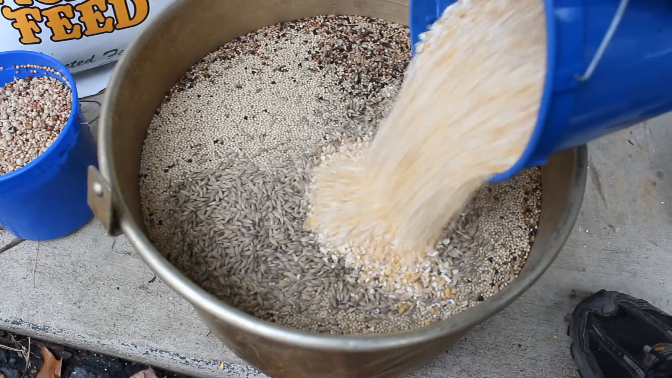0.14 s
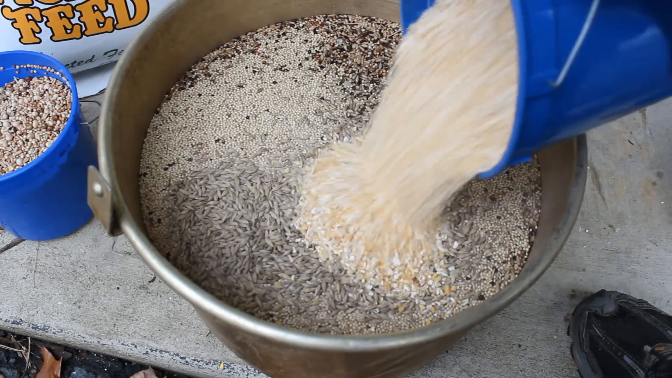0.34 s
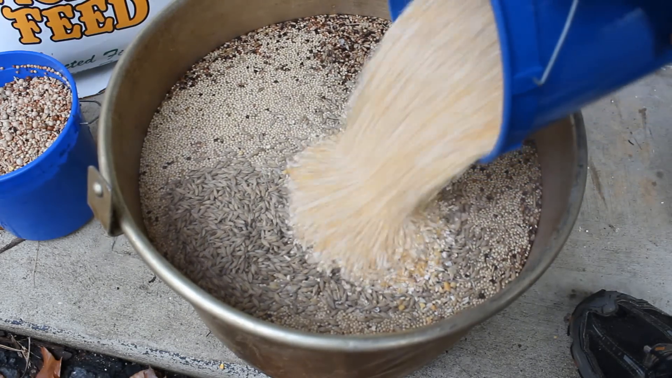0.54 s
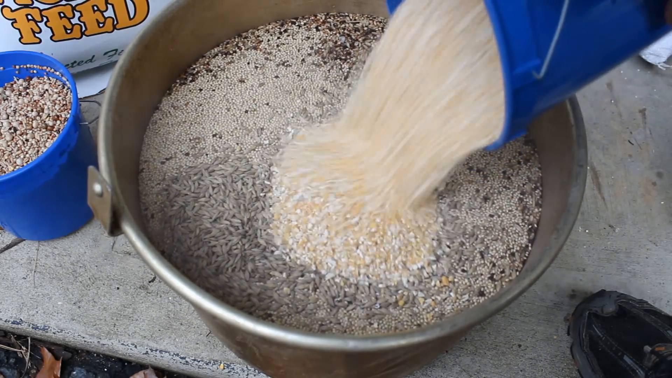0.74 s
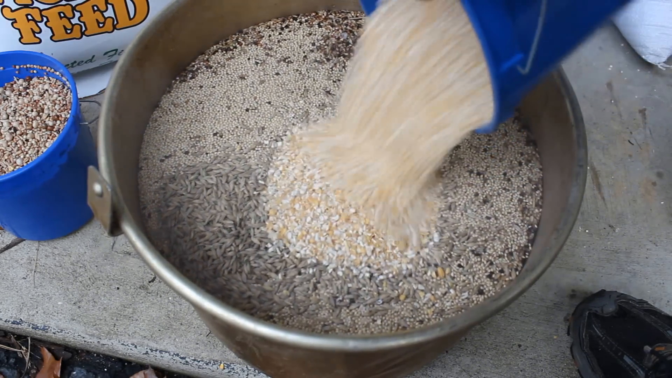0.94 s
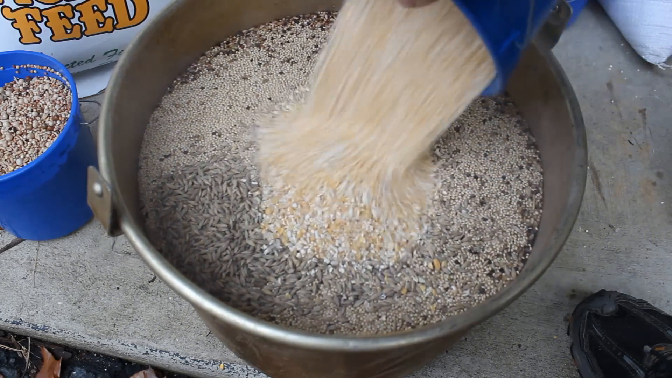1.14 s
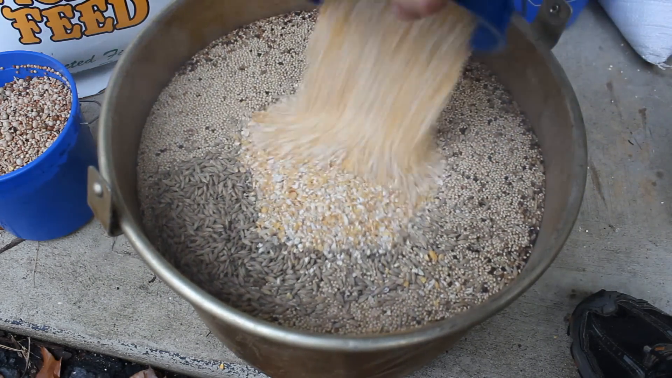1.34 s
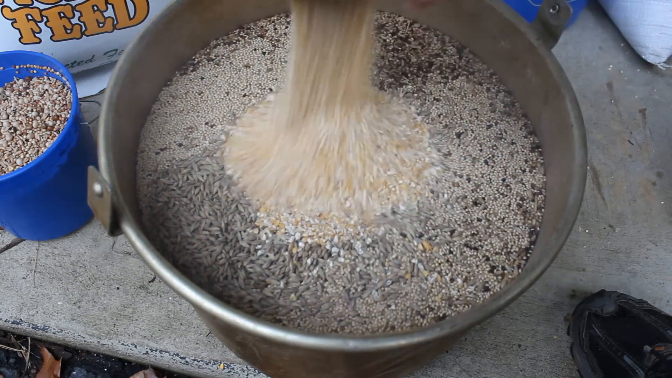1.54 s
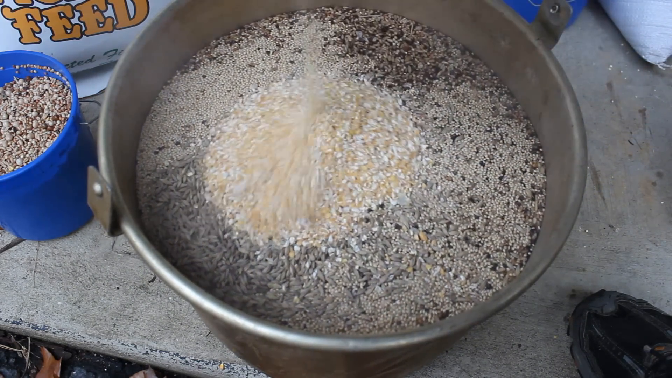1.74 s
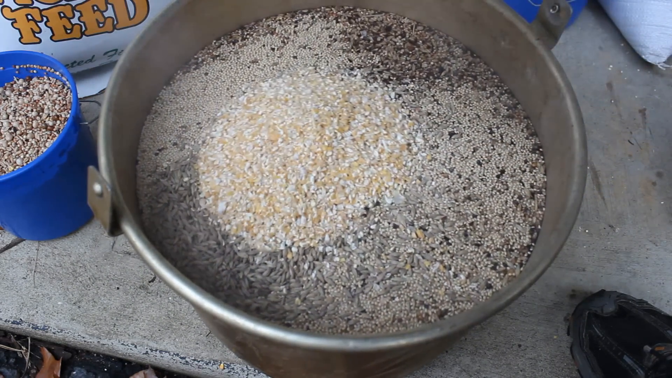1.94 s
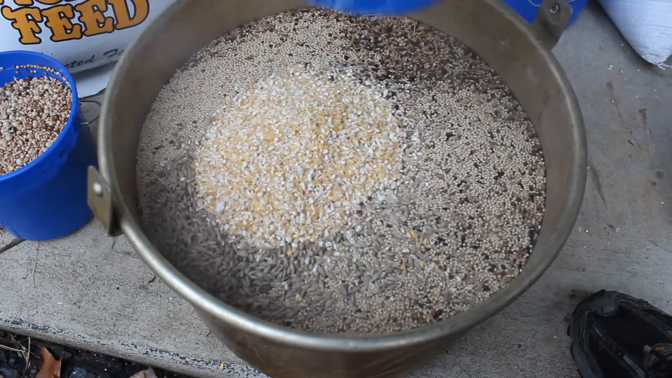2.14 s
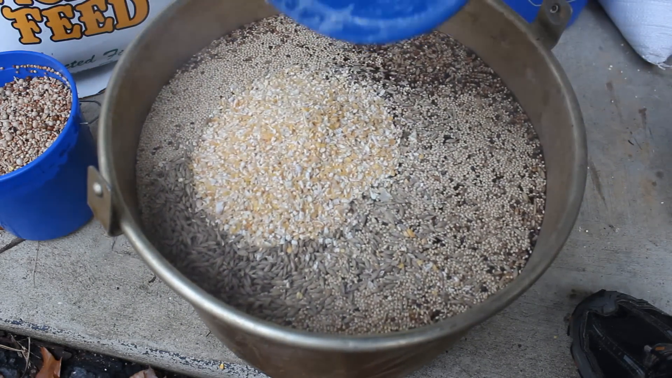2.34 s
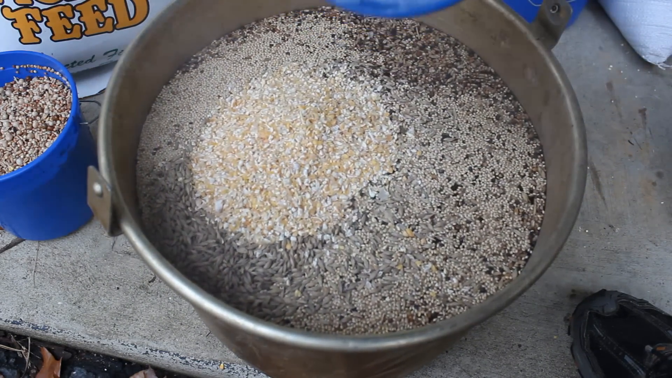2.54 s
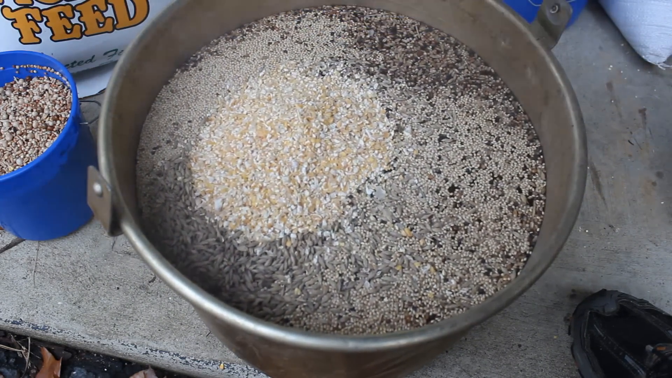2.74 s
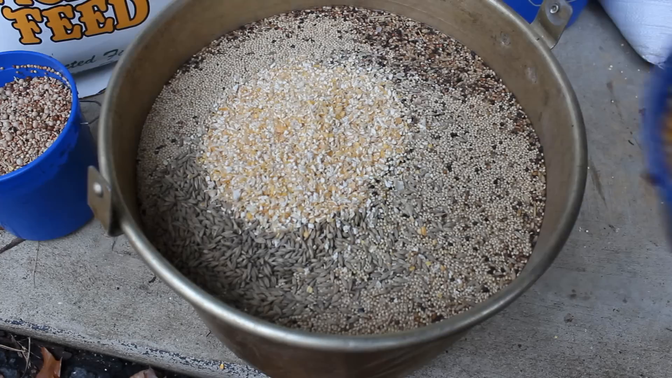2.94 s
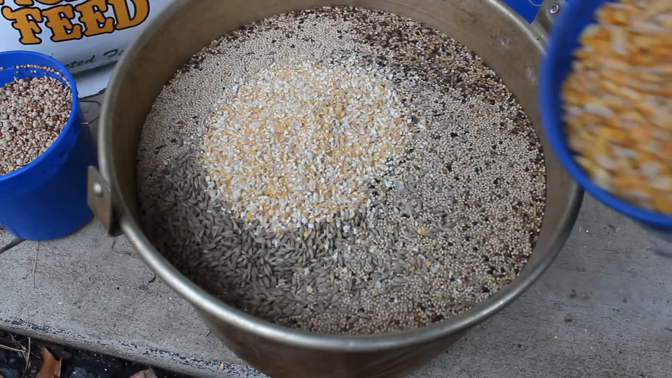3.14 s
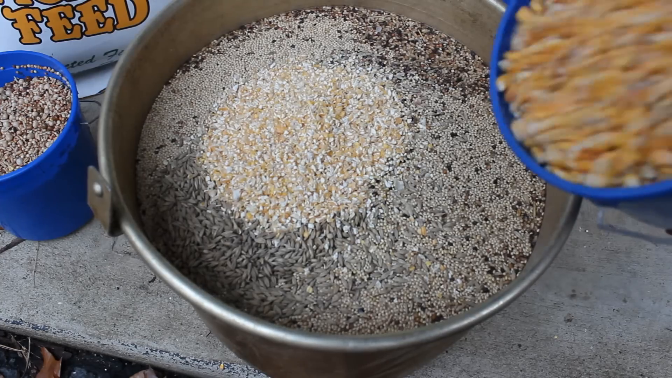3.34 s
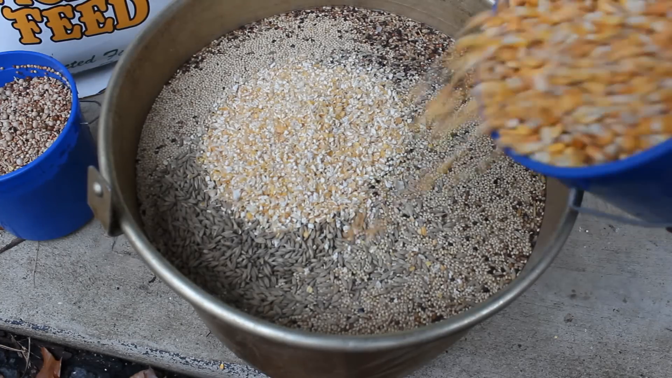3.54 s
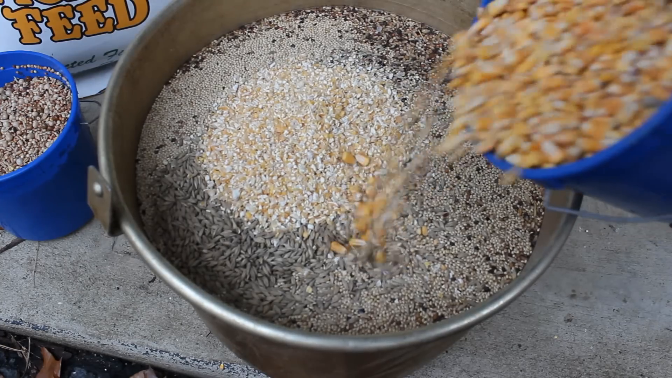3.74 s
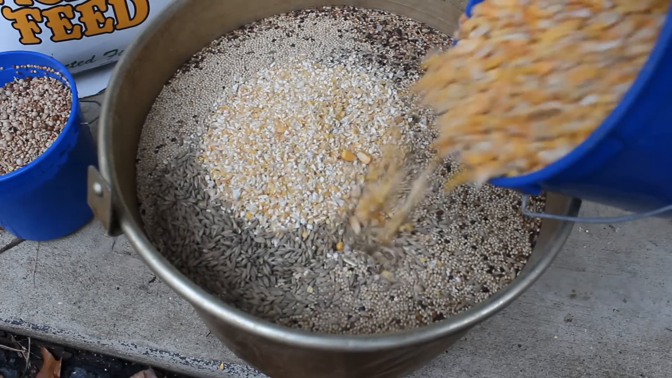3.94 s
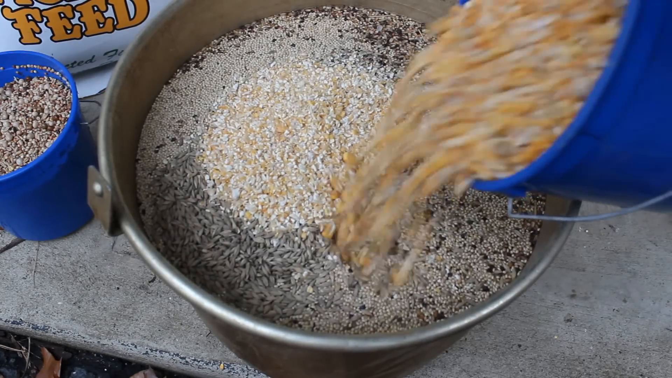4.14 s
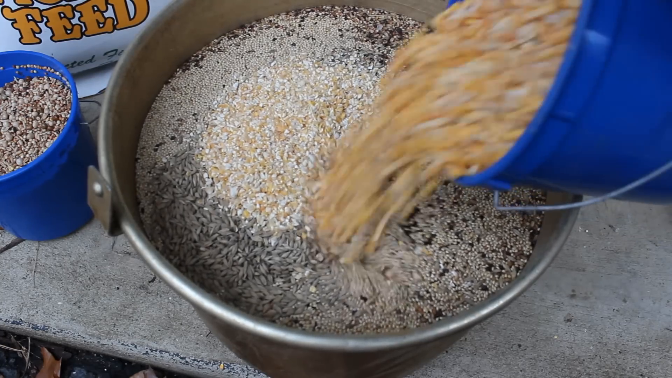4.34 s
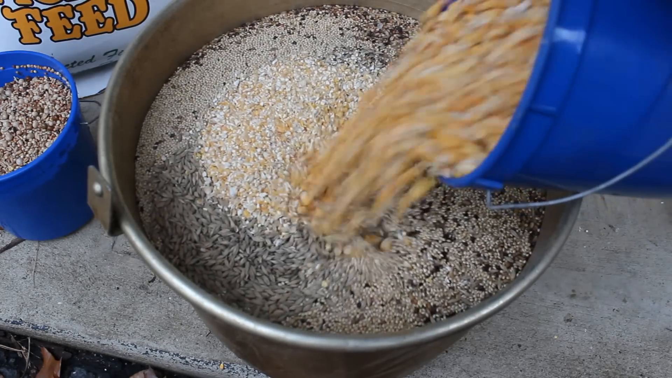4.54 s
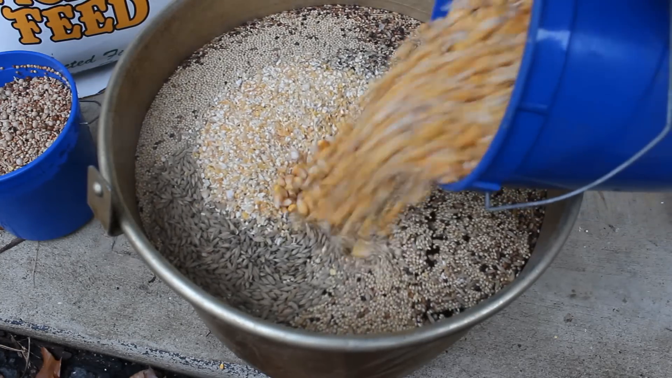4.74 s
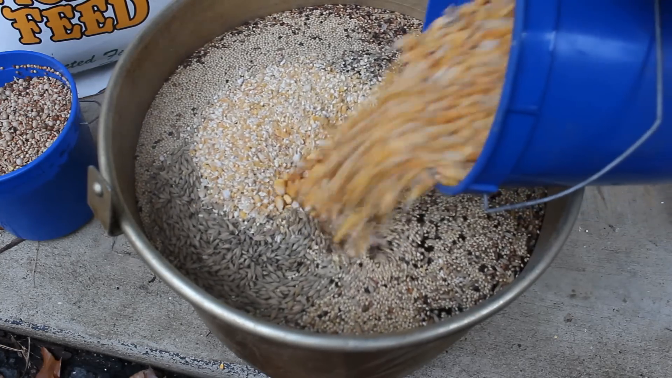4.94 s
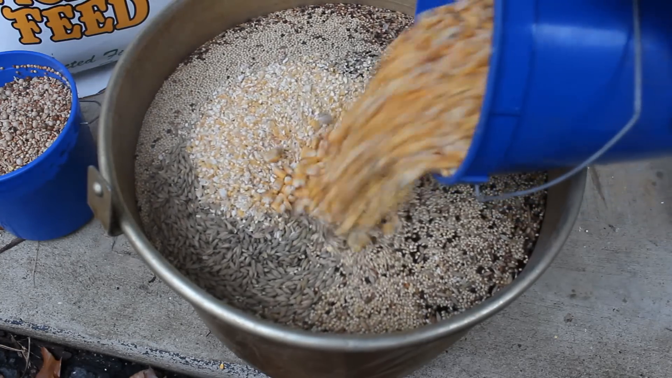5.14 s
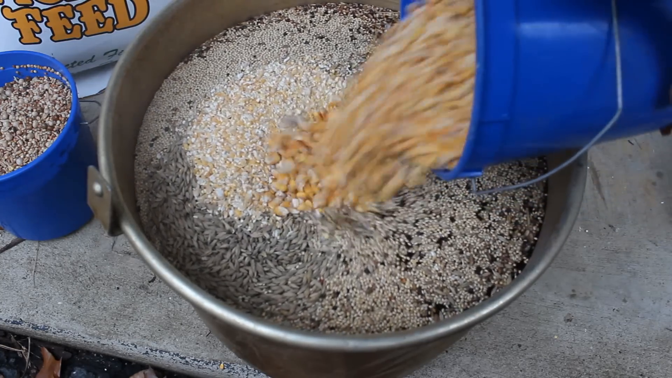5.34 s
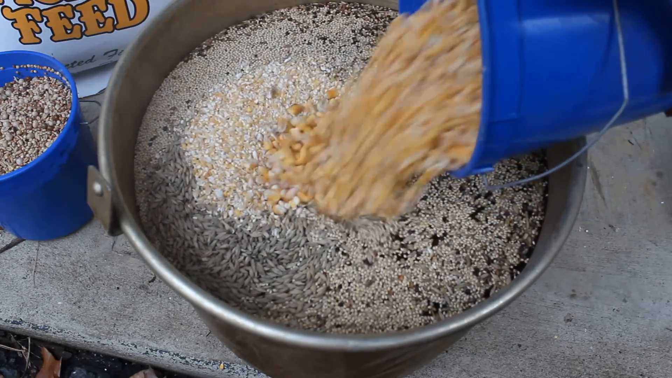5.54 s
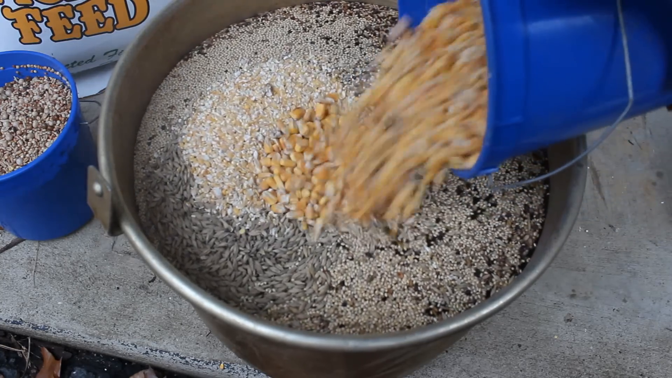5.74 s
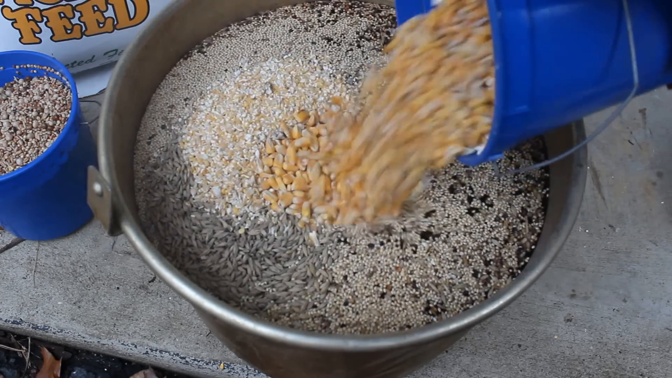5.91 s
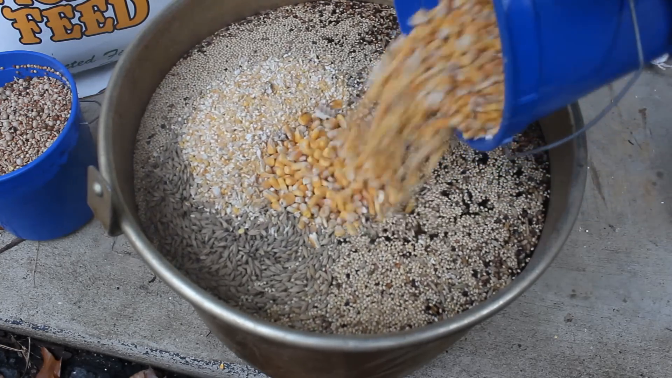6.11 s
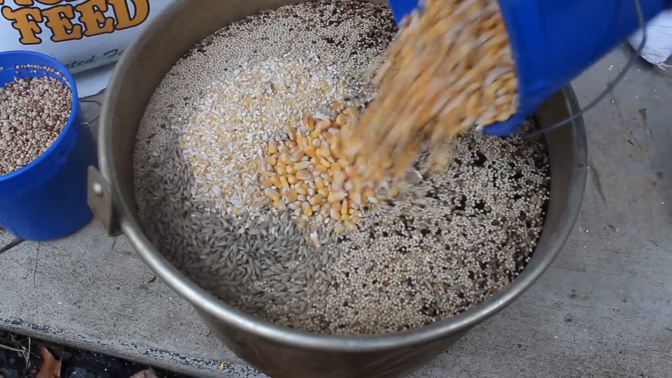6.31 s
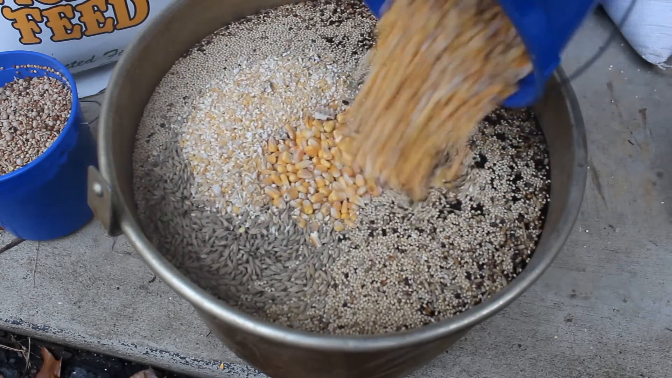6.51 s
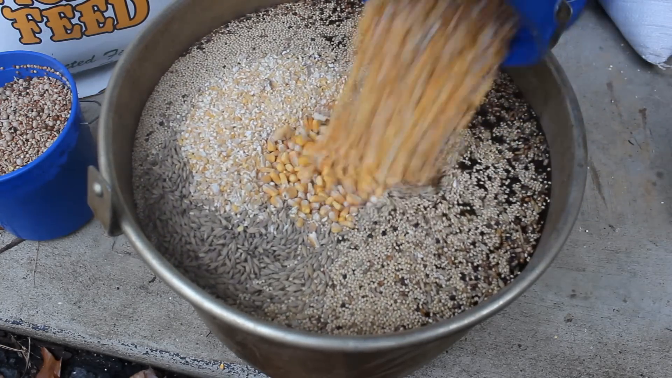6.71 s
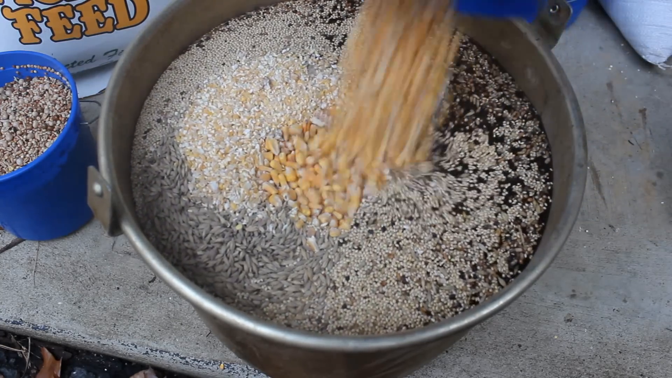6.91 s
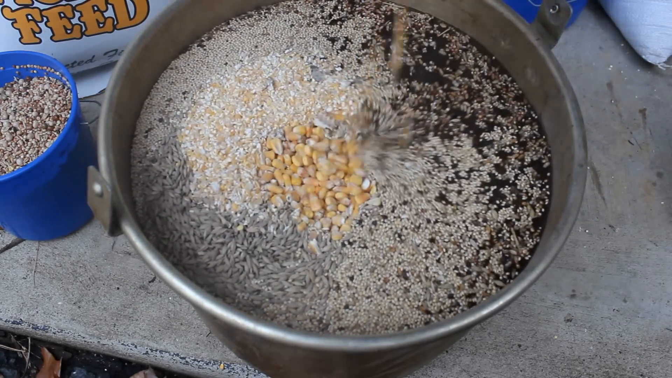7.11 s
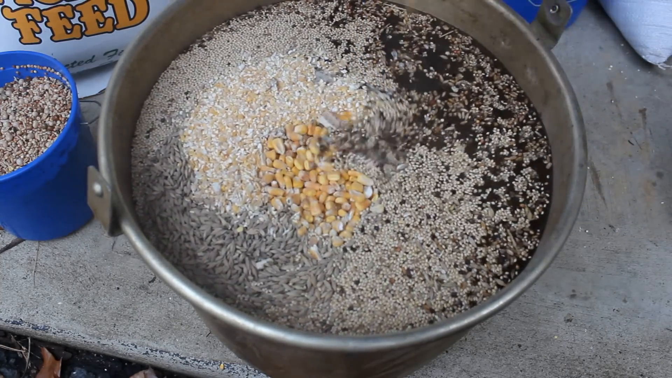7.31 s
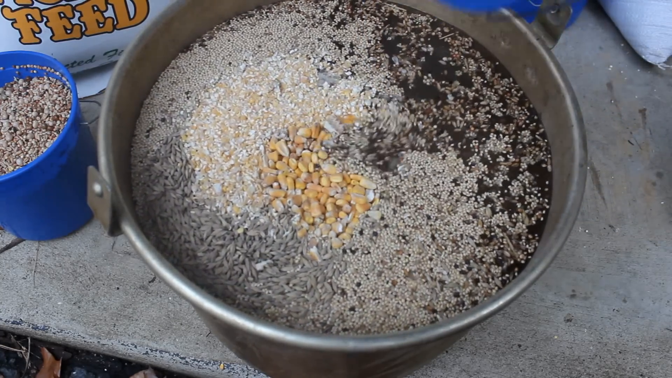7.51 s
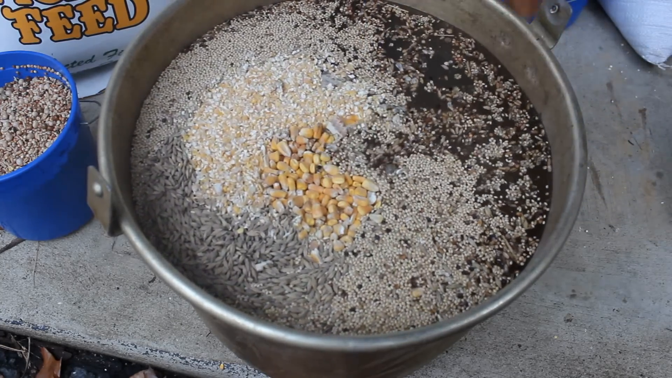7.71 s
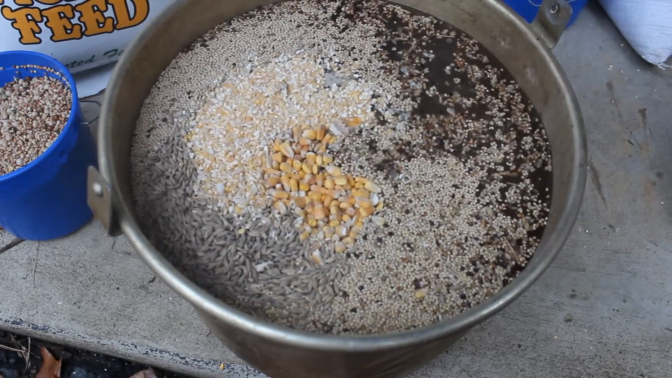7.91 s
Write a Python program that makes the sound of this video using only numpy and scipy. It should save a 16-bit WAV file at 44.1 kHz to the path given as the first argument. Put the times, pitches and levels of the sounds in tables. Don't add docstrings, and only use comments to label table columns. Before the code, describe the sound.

Close outdoor mono pickup. Fine dry grain hisses from a plastic bucket into a metal pot of seed, swelling then stopping with a faint metallic ring. Leftovers tick and rattle, the wire handle clacks sharply, then whole kernels knock on plastic, trickle and build into a loud, coarse gush. A few last knocks follow over faint traffic and trilling insects.

```python
import sys
import numpy as np
from scipy import signal
from scipy.fft import rfft, irfft, next_fast_len
from scipy.io import wavfile
from scipy.ndimage import uniform_filter1d, map_coordinates

SR = 44100
rng = np.random.default_rng(int(sys.argv[2]) if len(sys.argv) > 2 else 0)


def to_wav(s):
    ch = np.atleast_2d(s).T
    pcm = np.round(np.clip(ch, -1, 1) * 32767)
    wavfile.write(sys.argv[1], SR, pcm.astype(np.int16))


def to_linear_factor(level_db):
    exponent = np.asarray(level_db, float) / 20
    return 10 ** exponent


N = 355754


def unit(x):
    return x / np.sqrt(np.mean(x ** 2) + 1e-20)


def curves(rows):
    s, *cols = np.transpose(rows)
    return np.array([np.interp(np.arange(N) / SR, s, c) for c in cols])


def wobble(rate):
    return map_coordinates(rng.standard_normal(int(N * rate / SR) + 4), [np.arange(N) * rate / SR])


def coloured(x, spectrum):
    m = 2 * next_fast_len(len(x) // 2 + 4096, True)
    f, db = np.transpose(spectrum)
    log_hz = np.log(np.fft.rfftfreq(m, 1 / SR) + 1)
    gain = to_linear_factor(np.interp(log_hz, np.log(f + 1), np.maximum(db, -60)))
    cepstrum = irfft(np.log(unit(gain)), m)
    cepstrum[1:m // 2] *= 2
    cepstrum[m // 2 + 1:] = 0
    return irfft(rfft(x, m) * np.exp(rfft(cepstrum)), m)[:len(x)]


def place(out, start_s, sound):
    out[round(start_s * SR):][:len(sound)] += sound


# hz, level_db_per_hz
TRAFFIC_COLOUR = [(12, -42), (20, -13), (102, 1.5), (159, -6), (216, -2), (330, -9), (488, -7.5),
                  (611, -8.5), (743, -9), (2480, -18.5), (3570, -22), (4220, -25), (4990, -27.5),
                  (14900, -39), (16200, -40)]
# time_s, level_db
YARD_LEVEL = [(0, -44), (2.2, -43.5), (2.9, -44), (3.6, -43), (4.6, -50.5), (5.7, -46), (6.9, -49),
              (7.8, -45.5)]
# time_s, level_db
INSECT_LEVEL = [(1.8, -60), (2.1, -52), (2.5, -52), (3.0, -54), (3.3, -51), (7.6, -49)]


def yard():
    z = signal.stft(rng.standard_normal(N + 512), nperseg=512)[2]
    patches = uniform_filter1d(rng.standard_normal(z.shape), 5, axis=0)
    patches = uniform_filter1d(patches, 12, axis=1)
    air = signal.istft(z * to_linear_factor(0.8 * unit(patches)), nperseg=512)[1][:N]
    traffic = to_linear_factor(curves(YARD_LEVEL)[0] + 0.61 * wobble(2.28)) * unit(coloured(air, TRAFFIC_COLOUR))
    stroke_phase = 2 * np.pi * np.cumsum(60 + 8 * wobble(5.8)) / SR
    strokes = to_linear_factor(4.4 * np.sin(stroke_phase) + 0.84 * wobble(8))
    wing = [(3500, -37), (3950, -1), (4190, 0), (4450, -7), (4900, -30.5)]
    trill = unit(coloured(strokes * rng.standard_normal(N), wing))
    return traffic + to_linear_factor(curves(INSECT_LEVEL)[0]) * trill


# pitch_hz, level_db, t60_s
POT_MODES = [(489, -45.5, 5), (558, -50.5, 6)]


def pot():
    t = np.arange(N) / SR - 1.84
    swell = np.clip(1 + t / 0.25, 0, 1) ** 2
    out = np.zeros(N)
    for hz, db, t60 in POT_MODES:
        level = to_linear_factor(db - 60 * t.clip(0) / t60 + wobble(4.8))
        out += swell * level * np.sin(2 * np.pi * hz * t)
    return out


# start_s, clack_db, thump_db
HANDLE_FALLS = [(2.872, -2, -27.5), (2.944, -14.5, -36), (3.141, -58, -45), (3.185, -41, -27.5),
                (3.21, -58, -35), (3.245, -42, -34)]
# pitch_hz, level_db, t60_s
WIRE_MODES = [(934, -16.5, 0.03), (1525, -9.5, 0.029), (2000, -1, 0.026), (2810, 0, 0.019),
              (3560, -4, 0.015), (4720, -7.5, 0.023), (5170, -9, 0.018), (6540, -6, 0.013),
              (7200, -20, 0.02), (7300, -20, 0.025)]


def handle():
    t, out = np.arange(SR // 8) / SR, np.zeros(N + SR)
    grit_colour = [(300, -24), (2000, 2.5), (5000, -5.5), (8000, -11.5), (12000, -15), (16000, -20)]
    puff_colour = [(70, -14), (170, -3), (450, -0.5), (800, -8), (2000, -32)]
    attack = 1 - np.exp(-t / 0.00037)
    for s, clack_db, thump_db in HANDLE_FALLS:
        ring = np.zeros(len(t))
        for hz, db, t60 in WIRE_MODES:
            ring += to_linear_factor(db + rng.normal(0, 1.6) - 60 * t / t60) * np.sin(2 * np.pi * hz * t)
        grit = (to_linear_factor(-60 * t / 0.01) + to_linear_factor(-22.5 - 60 * t / 0.12)) * rng.standard_normal(len(t))
        clack = ring + to_linear_factor(-1.5) * coloured(grit, grit_colour)
        puff = coloured(to_linear_factor(-60 * t / 0.032) * rng.standard_normal(len(t)), puff_colour)
        place(out, s, (to_linear_factor(clack_db - 2.0) * clack + to_linear_factor(thump_db) * puff) * attack)
    return out[:N]


# start_s, peak_db
RIM_GLANCES = [(3.9413, -0.5), (7.307, -11), (7.4485, -17.5)]
# start_s, peak_db
SPARKS = [(3.1844, -37), (3.2417, -36), (3.2677, -28), (3.2886, -26), (3.328, -27), (3.351, -34),
          (3.36, -32), (3.3774, -32), (3.3839, -26), (3.4158, -26), (3.4383, -26), (3.4488, -24),
          (3.4857, -19), (3.5256, -20), (3.5495, -26), (3.6463, -26), (3.6767, -28), (3.6972, -29),
          (3.7241, -24), (3.7501, -29), (3.766, -13), (3.783, -19), (3.783, -8), (3.7975, -3),
          (3.8414, -13), (3.8573, -20), (3.8633, -15), (3.9157, -15), (3.9415, -3), (3.9681, -17),
          (3.9935, -27), (4.021, -28), (4.0679, -26), (4.0868, -23), (4.1237, -20), (4.1866, -20),
          (4.2035, -33), (4.2035, -12), (4.2425, -18), (4.2789, -22), (4.2789, -13), (4.3173, -11),
          (4.4066, -19), (4.439, -18), (4.46, -12), (4.674, -17), (4.7049, -12), (4.7937, -14), (4.839, -8),
          (4.8965, -9), (5.0387, -2), (5.316, -12),
          (2.36, -24), (2.3734, -27), (2.3804, -33), (2.4224, -32), (2.5184, -39), (2.5237, -32),
               (2.5406, -52), (2.5406, -37), (5.4929, -5), (7.2943, -15), (7.3243, -23), (7.3344, -27),
               (7.3662, -17), (7.4071, -21), (7.5053, -35), (7.549, -26), (7.6216, -42), (7.645, -40),
               (7.6695, -32), (7.7957, -43), (7.8072, -31), (7.8224, -36), (7.865, -41), (7.9399, -38)]


def rim():
    t, out = np.arange(SR // 20) / SR, np.zeros(N + SR)
    fall = to_linear_factor(-60 * t / 0.0017) + to_linear_factor(-20 - 60 * t / 0.043)
    sparks = [(s, db - 5) for s, db in SPARKS]
    for s, db in RIM_GLANCES + sparks:
        place(out, s, to_linear_factor(db) * fall * np.sign(rng.standard_normal(len(t))))
    return coloured(out, [(5000, -36), (9000, -9), (12000, 1), (15500, 1), (17000, -9)])[:N]


# start_s, peak_db, ring_hz, hollow_db
SHAKEN = [(1.8462, -21, 4060, -18), (1.9475, -23.5, 3540, -15), (2.3107, -13, 3540, -27),
          (2.3413, -12, 1950, -22), (2.354, -16, 1920, -21), (2.361, -15, 3300, -16),
          (2.374, -11.5, 4120, -31), (2.3817, -21, 2920, -22), (2.4023, -9, 2820, -34),
          (2.4387, -14, 3400, -21), (2.4744, -19, 3050, -27), (2.6373, -22, 3070, -20),
          (2.661, -19.5, 3720, -23), (2.726, -19, 2700, -14), (2.7686, -23, 3000, -27),
          (2.9133, -20, 3070, -25), (3.1843, -19.5, 3520, -6), (3.2508, -21.5, 2000, -2),
          (3.3288, -23, 3210, -8)]
# start_s, peak_db, ring_hz, hollow_db
FIRST = [(3.3512, -13, 3140, -5.5), (3.3604, -8, 2700, -21), (3.3827, -11, 2640, -21),
         (3.394, -11, 2540, -14), (3.404, -12, 3160, -14), (3.4166, 2.5, 2650, -29), (3.438, 1, 2610, -22),
         (3.4505, 2.5, 2700, -13), (3.486, 0, 2800, -16), (3.4976, -1.5, 3450, -14),
         (3.55, -0.5, 3350, -14), (3.5966, -4.5, 2900, -29), (3.6178, -6, 2970, -21),
         (3.677, -5, 2320, -25), (3.6906, -5, 2450, -24), (3.7254, -16, 4120, -19), (3.75, -8, 2940, -13),
         (3.7835, -9.5, 4110, -14), (3.798, -10, 4100, -30.5), (4.04, -10, 3240, -17),
         (4.1, -11.5, 2600, -5), (4.185, -7, 2890, -8), (4.1982, -2, 2550, -17), (4.2126, -9, 3100, -7),
         (4.318, -7, 3670, -9), (4.4472, -10, 3230, -26), (4.491, -3.5, 3200, -14), (4.6038, -5, 2510, -17),
         (4.7353, -4, 3640, -15), (4.807, -20, 4380, -29)]
# start_s, peak_db, ring_hz, hollow_db
LAST = [(7.2109, -7, 4350, -23), (7.289, -19, 2900, -15), (7.3149, -1.5, 2400, -12), (7.351, 0, 3400, -23),
        (7.3577, 0, 2380, -21.5), (7.3653, -2.5, 2900, -24), (7.4057, -6, 3380, -26),
        (7.419, -0.5, 3000, -16), (7.4485, -9.5, 2820, -25), (7.487, -10, 2370, -12),
        (7.495, -2, 1990, -13)]
# start_s, peak_db, ring_hz, hollow_db
DREGS = [(7.673, -19, 3560, -21), (7.7395, -14, 2900, -17), (7.7591, -8, 3120, -25),
         (7.7698, -2.5, 3160, -17), (7.8083, -1, 2510, -22), (7.863, -13.5, 3070, -8),
         (7.875, -14.5, 3080, -7), (7.9042, -5.5, 3070, -13), (7.942, -15, 2400, -1.5),
         (7.993, -14.5, 2640, -16), (8.0006, -8.5, 2430, -3), (8.053, -13.5, 2550, -7),
         (8.0604, -17, 3320, -10)]
# start_s, peak_db
CLICKS = [(2.353, -19), (2.4032, -26), (2.5444, -29), (3.726, -15), (3.7757, -17), (3.782, -13),
          (3.798, -13), (3.8185, -15), (3.864, -16), (3.877, -14), (3.9684, -20), (4.035, -21),
          (4.124, -14), (4.1944, -11), (4.2033, -15), (4.279, -13), (4.317, -5), (4.4614, -5), (4.516, -6),
          (4.633, -6.5), (4.8064, -8.5), (4.839, -9.5), (4.8726, -9), (4.898, -9), (6.393, -6.5),
          (7.1604, -12), (7.2497, -12), (7.549, -23), (7.6703, -29)]
GLINT_DB = -19, -15.5, -25.5


def clicks():
    t, out = np.arange(SR // 20) / SR, np.zeros(N + SR)
    fall = to_linear_factor(-60 * t / 0.0022) + to_linear_factor(-16.0 - 60 * t / 0.086)
    glints = []
    for rows, under_db in zip([SHAKEN, FIRST, LAST + DREGS], GLINT_DB):
        glints += [(s, db + under_db) for s, db, *_ in rows]
    for s, db in CLICKS + glints:
        spike = fall * rng.standard_normal(len(t))
        spike *= 2 * np.linalg.norm(fall) / np.linalg.norm(spike)
        place(out, s, to_linear_factor(db - 6.5) * spike)
    colour = [(1500, -57), (4000, 4.0), (7000, 3.5), (11000, -5.0), (15000, -7), (17000, -13.0)]
    return coloured(out, colour)[:N]


# hz, level_db_per_hz
HOLLOW = [(470, -34), (800, -10.5), (889, -3), (1230, 2.5), (1380, 0.5), (1510, 3), (1720, -13), (1800, -1),
          (2340, -28.5), (3960, -120)]


def knocks(rows, bed, ring_db, t60, air_hz, air_db):
    t = np.arange(SR // 8) / SR
    body, hollow, rings = np.zeros((3, N + SR))
    rise = 1 - np.exp(-t / 0.00026)
    fall = rise * (to_linear_factor(-60 * t / t60) + to_linear_factor(-9.0 - 60 * t / (3 * t60)) + 1.63 * to_linear_factor(-60 * t / 0.006))
    for s, db, hz, hollow_db in rows:
        burst = fall * np.sign(rng.standard_normal((2, len(t))))
        detune = 0.084 * rng.standard_normal((5, 1))
        detune[0] = 0
        ratios = np.array([[1], [1.38], [.74], [1.18], [.86]]) * np.exp(detune)
        modes = np.sin(2 * np.pi * hz * ratios * t) * to_linear_factor([[0], [-6], [-7], [-5], [-6]])
        place(rings, s, to_linear_factor(db + ring_db - 60 * t / (0.42 * t60)) * rise * modes.sum(axis=0))
        air_pitch_hz = air_hz * (1 + 0.013 * rng.standard_normal())
        air = to_linear_factor(db + air_db - 60 * t / 0.062) * np.sin(2 * np.pi * air_pitch_hz * t)
        place(rings, s, (1 - np.exp(-t / 0.0023)) * air)
        place(body, s, to_linear_factor(db - 21.5) * burst[0])
        place(hollow, s, to_linear_factor(db + hollow_db - 13.5) * burst[1])
    return (rings + coloured(body, bed) + coloured(hollow, HOLLOW))[:N]


# start_s, peak_db, ring_hz, hollow_db
STRAYS = [(0.0194, -22, 3160, -22), (0.0478, -17, 4270, -23), (2.3944, -9.5, 2950, -22),
          (2.41, -15, 2810, -20), (2.4474, -17, 3070, -20), (2.4894, -35, 3070, -20),
          (2.518, -26, 3220, -20), (2.541, -26, 2920, -20), (2.5894, -29, 3950, -20),
          (2.6244, -30, 2610, -20), (2.6994, -25, 3670, -20), (2.7394, -33, 2820, -20),
          (2.7844, -27, 2680, -20), (2.7994, -31, 1880, -17), (3.4753, -3, 2820, -20),
          (3.5094, -5, 3260, -16), (3.5265, -5, 3270, -23), (3.5664, -16, 3030, -25),
          (3.6475, -12, 2020, -20), (3.7667, -11, 4160, -9), (3.855, -22, 2880, -20),
          (3.895, -17, 3120, -20), (4.01, -22, 3130, -20), (4.0685, -16, 3080, -20),
          (4.2361, -15, 3100, -15), (4.2695, -12, 3110, -20), (4.3718, -14, 3160, -20),
          (4.6766, -19, 3000, -20), (7.1894, -10, 2890, -20), (7.2614, -21, 3840, -20),
          (7.5052, -8, 1990, -16), (7.6221, -28, 1950, -20), (7.6444, -28, 4060, -20),
          (7.6894, -21, 2590, -20), (7.7144, -27, 3220, -20)]
# start_s, peak_db, ring_hz, hollow_db
CLUMPS = [(4.8498, -5.5, 3260, -18), (4.898, -11, 2580, -21), (5.0269, -15, 2690, -18),
          (5.0453, -1.5, 2950, -16), (5.1505, -5, 2750, -18), (5.2728, -11, 2960, -14),
          (5.3084, -6, 2960, -14), (5.3505, -8, 3100, -18), (5.4338, -1, 3660, -20),
          (5.4591, -1, 3110, -11), (5.4922, -2, 3400, -14), (5.5428, -6, 2800, -9),
          (5.6074, 0, 3050, -10.5), (5.6685, -19, 2620, -20), (5.6914, -13, 3200, -18),
          (5.7592, -8, 3020, -16), (5.7762, -15, 2920, -18), (5.8261, -8, 2880, -18),
          (5.8804, 0.5, 2170, -14), (5.94, -23, 3230, -24), (6.0077, -9, 3430, -22),
          (6.0336, -3.5, 2200, -18), (6.091, -0.5, 2960, -12), (6.1164, -5, 2980, -18),
          (6.1543, -10, 3460, -18), (6.1701, -2, 3130, -18), (6.214, -4.5, 3000, -10),
          (6.301, -1, 3070, -20), (6.3906, -7, 2970, -16), (6.4926, -5, 2070, -23), (6.6045, -8, 2600, -20),
          (6.6356, -2, 3080, -16), (6.7076, -5, 3140, -21), (6.9121, -6, 3330, -18),
          (6.9893, -8, 3350, -21), (7.021, 0, 1900, -13)]
# hz, level_db_per_hz
SHAKE_BED = [(940, -36.5), (1600, -8.5), (2060, -2.5), (2290, -7.5), (2590, -3), (2700, -1.5), (2820, 0),
             (5360, -14.5), (8500, -33.5), (11000, -70), (18700, -120)]
# hz, level_db_per_hz
WHOLE_BED = [(940, -17.5), (1600, -2), (1730, -3.5), (1870, -3), (3060, 4), (3810, -1), (6340, -6),
             (8500, -32), (11000, -24), (18700, -120)]


def plastic_hits():
    hits = knocks(SHAKEN, SHAKE_BED, ring_db=-9.0, t60=0.043, air_hz=1940, air_db=-31)
    hits += knocks(FIRST, SHAKE_BED, ring_db=-9.0, t60=0.037, air_hz=2650, air_db=-20)
    hits += knocks(LAST, SHAKE_BED, ring_db=-10, t60=0.043, air_hz=1187, air_db=-19.5)
    hits += knocks(DREGS, WHOLE_BED, ring_db=-8.0, t60=0.042, air_hz=1046, air_db=-35)
    hits += knocks(STRAYS, SHAKE_BED, ring_db=-9.0, t60=0.038, air_hz=2900, air_db=-33)
    hits += knocks(CLUMPS, WHOLE_BED, ring_db=-14.5, t60=0.075, air_hz=1254, air_db=-28)
    return hits


def impacts(rate, spread_db, clump_db, t60):
    chance = rng.random((2, N))
    lands = chance[0] < rate / SR * to_linear_factor(clump_db * wobble(25))
    size = to_linear_factor(-2 * spread_db * np.log(chance[1] + 1e-9).clip(-4))
    energy = lands * size / rate

    def dying(life_s):
        return signal.lfilter([1], [1, -to_linear_factor(-2 * 60 / (life_s * SR))], energy)

    power = dying(t60) + 3 * dying(0.0024)
    return np.sqrt(power / np.mean(power)) * rng.standard_normal(N)


def sung(x, hz, width_hz):
    turn = np.exp(2j * np.pi * np.cumsum(hz * (1 + 0.0075 * wobble(12))) / SR)
    ring = (signal.lfilter([1], [1, -np.exp(-np.pi * width_hz / SR)], x / turn) * turn).real
    return unit(ring * to_linear_factor(2.1 * wobble(12)))


# hz, level_db_per_hz
BOOM = [(180, -52.5), (300, -18), (329, -11), (475, 0), (595, -10.5), (671, -7), (813, -1), (900, -12),
        (1170, -14.5), (1980, -120)]
# hz, level_db_per_hz
TICK = [(5000, -26.5), (7000, 3), (8500, 1), (10500, -0.5), (13000, 0.5), (15300, 0.5), (16200, -4.5)]


def stream(spans, parts, bed, song, width_hz, rate, spread_db, clump_db, t60, shared, modes=((1, 0),)):
    t = np.arange(N) / SR
    full_db = -20
    on = np.zeros(N)
    for rows in spans:
        a, b = rows[0][0], rows[-1][0]
        on += np.interp(t, [a - .02, a, b, b + .02], [0, 1, 1, 0])
    flow_db, = curves(np.concatenate(spans))
    empty = np.interp(t, [spans[0][0][0], spans[-1][-1][0]], [0, 1])

    cushioned_db = np.minimum(flow_db, -20.5)
    levels = [flow_db]
    for felt_db, part in zip([flow_db, flow_db, cushioned_db], parts):
        over_db, follows, gain_db, last_db = part
        emptying_db = gain_db * empty + last_db * empty ** 5.1
        levels.append(full_db + over_db + follows * (felt_db - full_db) + emptying_db)

    rate = rate * np.maximum(to_linear_factor(.45 * (flow_db - flow_db.max())), .13)
    spread_db = spread_db + 0.093 * (full_db - flow_db).clip(0, 12)
    common = impacts(rate, spread_db, clump_db, t60)

    hz, song_db = curves(song)
    drive = coloured(common, [(500, -50.5), (1000, -2.5), (5000, 7.5), (9000, -36.5)])
    out = np.zeros(N)
    for ratio, db in modes:
        out += to_linear_factor(flow_db + song_db + db) * sung(drive, ratio * hz, ratio * width_hz)
    for db, colour, ring in zip(levels, [bed, HOLLOW, BOOM, TICK], [2.8, 1.04, 2.9, 0.33]):
        own = impacts(rate, spread_db, clump_db, ring * t60)
        out += to_linear_factor(db) * unit(coloured(shared * common + own, colour))
    return on * signal.sosfilt(signal.butter(2, 266, "high", fs=SR, output="sos"), out)


# time_s, level_db
SHAKE_FLOW = [
    [(2.28, -65), (2.39, -37.5), (2.46, -44), (2.51, -52), (2.59, -45), (2.66, -47.5), (2.73, -41.5),
     (2.8, -43.5), (2.86, -70)],
    [(3.17, -51.5), (3.34, -43.5), (3.43, -21.5), (3.52, -18.5), (3.62, -27.5), (3.76, -40)],
    [(7.28, -38), (7.38, -37), (7.5, -35), (7.58, -43), (7.63, -40.5), (7.68, -40.5), (7.72, -50),
     (7.82, -39), (7.94, -56.5), (8.07, -56)],
]
# over_patter_db, follow_db_per_db, emptying_gain_db, last_gain_db
SHAKE_PARTS = [
    (-14.5, 0.8, 9.5, -.6),
    (-28.5, 0.22, 8, -.6),
    (-20.5, 0.71, -1, 1.3),
]
# time_s, pitch_hz, over_patter_db
SHAKE_SONG = [(2.3, 3250, 0.5), (3.3, 2490, -17), (3.8, 2730, -41), (7.2, 1160, 6), (7.55, 1180, 4),
              (7.7, 1220, -9)]


def shaken_grain():
    return stream(SHAKE_FLOW, SHAKE_PARTS, SHAKE_BED, SHAKE_SONG, width_hz=140,
                  rate=3300, spread_db=5.5, clump_db=3.0, t60=0.038, shared=1.14)


# time_s, level_db
FINE_FLOW = [
    [(0, -35), (.13, -41), (.44, -38.5), (.63, -30.5), (.72, -31.5), (.95, -31), (1.24, -22), (1.65, -22.5),
     (1.73, -26), (1.8, -38), (1.93, -62.5)],
]
# over_patter_db, follow_db_per_db, emptying_gain_db, last_gain_db
FINE_PARTS = [
    (-13.5, 0.74, 0.5, 4),
    (-19.5, 0.74, 2.5, 1),
    (-6.5, 0.72, -8, 9.5),
]
# hz, level_db_per_hz
FINE_BED = [(940, -35), (1750, -6), (2430, 0.5), (3400, 0.5), (4790, -1), (5990, -5), (7710, -16),
            (8500, -44), (11000, -51), (18700, -120)]
# time_s, pitch_hz, over_patter_db
FINE_SONG = [(0, 2800, -22), (.6, 3050, -16), (1.1, 3280, -10), (1.25, 3380, -5.5), (1.75, 3470, -6)]


def fine_grain():
    return stream(FINE_FLOW, FINE_PARTS, FINE_BED, FINE_SONG, width_hz=180,
                  rate=7200, spread_db=-0.1, clump_db=2.0, t60=0.016, shared=0.82,
                  modes=[(1, 0), (.7, -11.5), (.35, -11.5)])  # (pitch ratio, dB)


# time_s, level_db
TRICKLE = [(3.74, -38.5), (3.9, -32), (4.0, -36.5), (4.178, -29), (4.195, -26.5), (4.41, -26), (4.5, -23.5),
           (4.75, -24.5), (5.04, -21), (5.1, -24.5)]
# time_s, level_db
GUSH = [(5.2, -18.5), (5.38, -19.5), (5.72, -18), (6.23, -19.5), (6.42, -22.5), (6.64, -16), (6.98, -16.5),
        (7.15, -19.5), (7.25, -29.5), (7.3, -35)]
# over_patter_db, follow_db_per_db, emptying_gain_db, last_gain_db
WHOLE_PARTS = [
    (-11, 1.1, 7.8, -4.5),
    (-29.5, 0.88, 30.3, -20.5),
    (-3.5, 1.17, 1.5, -4),
]
# time_s, pitch_hz, over_patter_db
WHOLE_SONG = [(3.7, 1490, -12), (5, 1406, -17), (6.2, 1270, -12.5), (6.7, 1190, -11.5), (6.9, 1200, -4),
              (7.1, 1200, -4), (7.3, 1180, -2)]


def whole_kernels():
    return stream([TRICKLE + GUSH], WHOLE_PARTS, WHOLE_BED, WHOLE_SONG, width_hz=60,
                  rate=2200, spread_db=4.0, clump_db=2.5, t60=0.019, shared=0.99)


def scene():
    metal = pot() + handle() + rim() + clicks()
    grain = plastic_hits() + shaken_grain() + fine_grain() + whole_kernels()
    return np.tile(yard() + metal + grain, (2, 1))


def low_pass(x):
    return signal.sosfilt(signal.butter(12, 16990, fs=SR, output="sos"), x)


def record(dry):
    sos = signal.ellip(10, .3, 70, 15800, fs=SR, output="sos")
    x = signal.sosfilt(sos, dry)
    x = x / (1 + np.abs(x) ** 8) ** (1 / 8)
    return low_pass(x)


dry = scene()
out = record(dry)
to_wav(out)
```